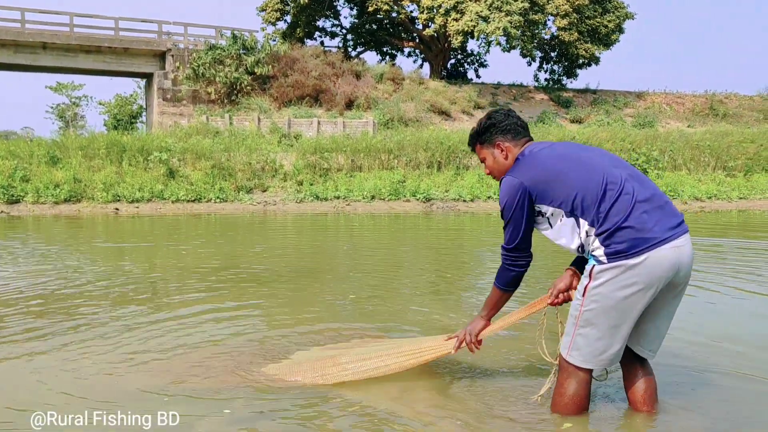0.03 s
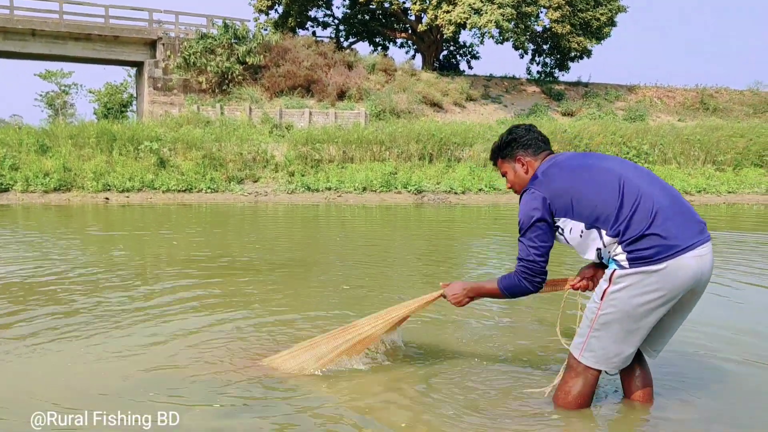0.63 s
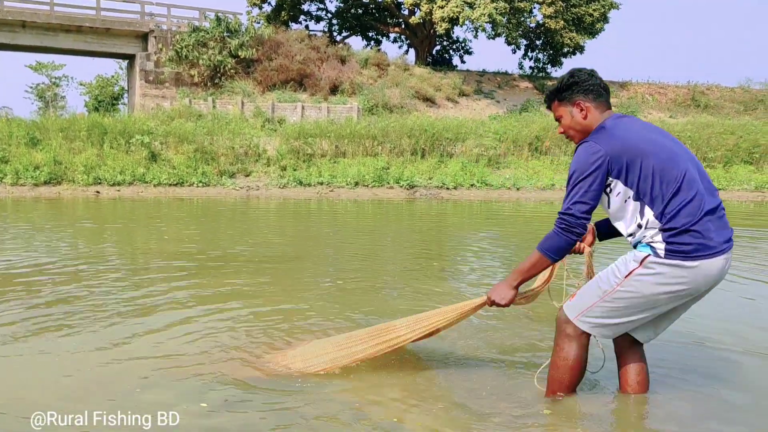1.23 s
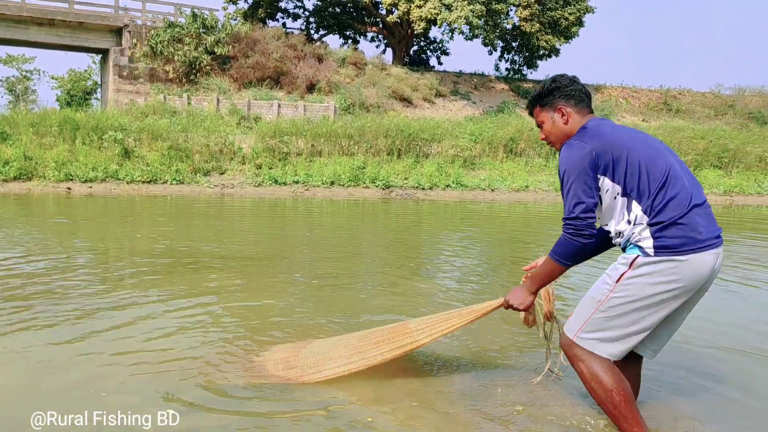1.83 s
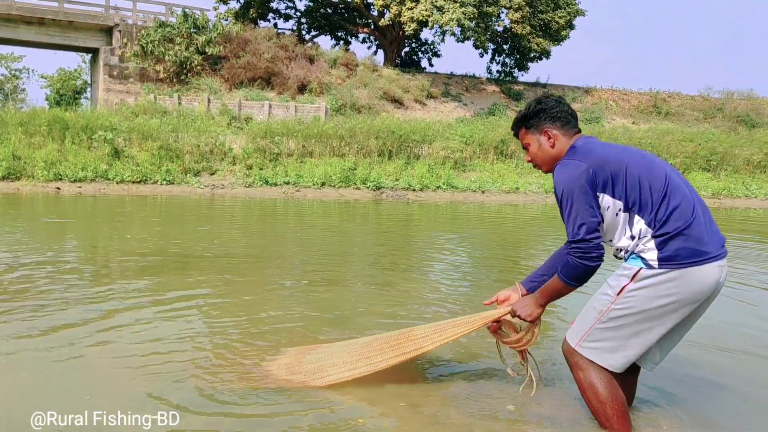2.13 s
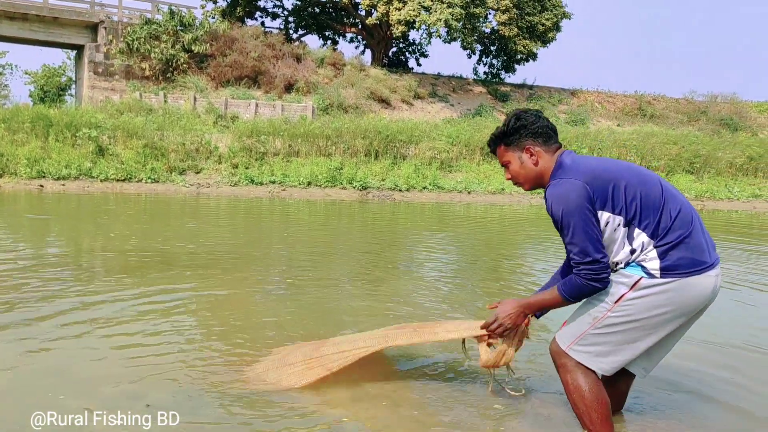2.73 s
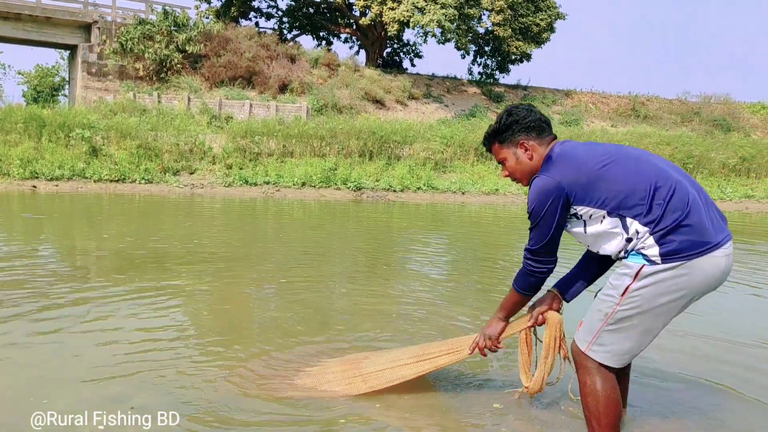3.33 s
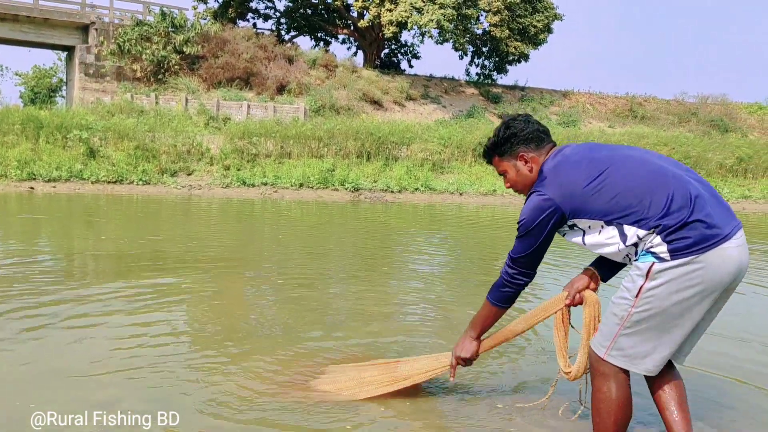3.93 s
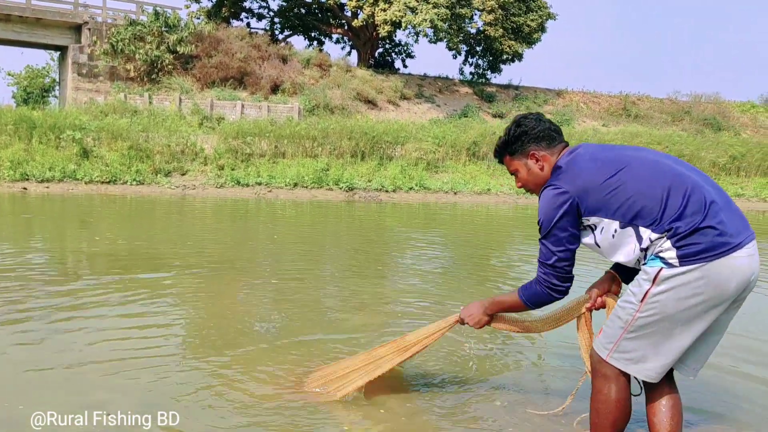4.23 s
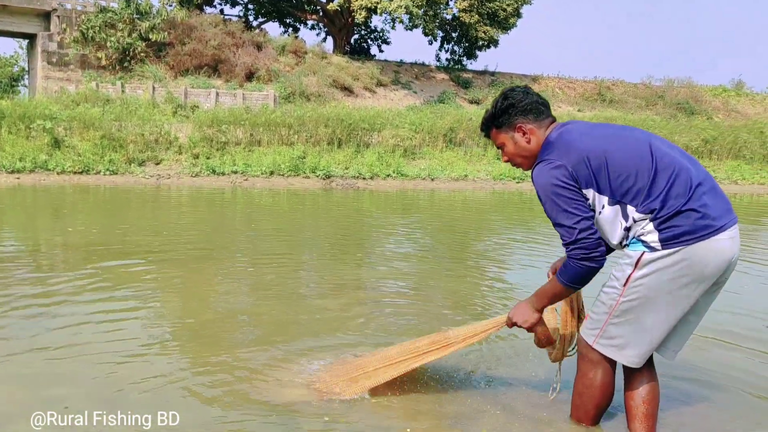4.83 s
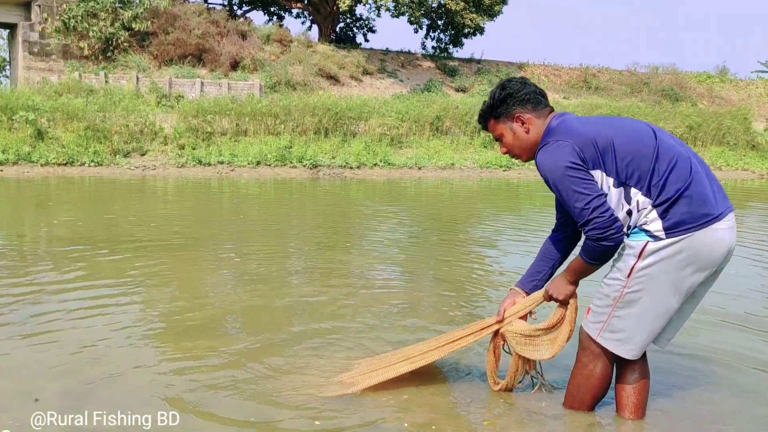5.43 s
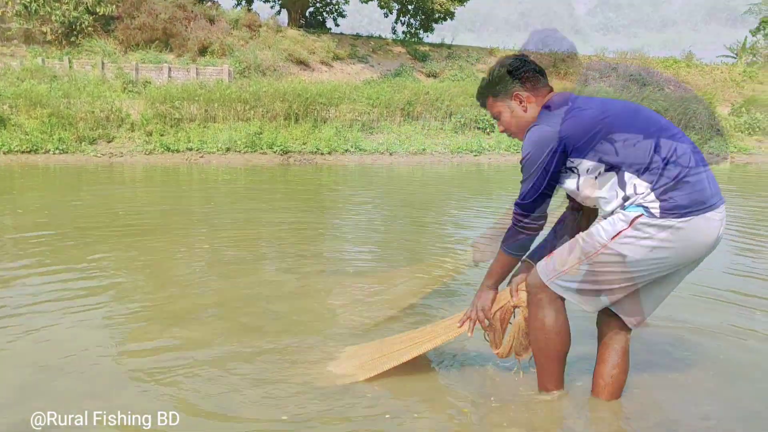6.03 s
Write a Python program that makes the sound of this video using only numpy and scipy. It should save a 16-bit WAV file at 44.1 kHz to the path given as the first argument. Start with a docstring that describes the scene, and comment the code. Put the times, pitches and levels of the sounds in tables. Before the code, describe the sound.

A wet fishing net is hauled through a shallow river close by. About a second in it slaps the surface and sheds spray, then water drips, trickles and gurgles. A foot splashes near the middle, and the net slaps and sprays again later. Small birds chirp and trill faintly from the bank, ending with one falling whistle. Wind rumbles and thumps on the microphone throughout.

```python
"""A wet cast net is hauled hand over hand out of a shallow river, while small birds call from the bank
and a breeze buffets the two ports of the microphone. About a second in, the mesh slaps the surface and
sheds a patter of spray; water drips, trickles and gurgles as trapped air rings. Near three seconds a
foot splashes and more bubbles follow. At four and a half the mesh slaps and sprays again, and one long
bird whistle slides down over the last drips."""
import sys
import numpy as np
from scipy import signal
from scipy.fft import rfft, irfft
from scipy.io import wavfile
from scipy.ndimage import uniform_filter1d

SR = 44100
rng = np.random.default_rng(int(sys.argv[2]) if len(sys.argv) > 2 else 0)


def materialize(psi):
    """Save the field psi as 16-bit PCM at rate SR to the path in sys.argv[1].

    A 1-D psi becomes a single channel; in a 2-D psi each row is a channel.
    """
    bounded = np.clip(np.atleast_2d(psi).T, -1, 1)
    quanta = np.round(bounded * 32767).astype(np.int16)
    wavfile.write(sys.argv[1], SR, quanta)


N = 269010
TIME = np.arange(N) / SR
HZ = np.fft.rfftfreq(N, 1 / SR)

# Net or foot hitting the water. Each row: crest time in seconds, relative level in dB, rise, hold and
# fall in seconds, brightness in dB per octave, body of the plunge in dB.
SLAPS = [(0.857, -41.5, 0.0041, 0.0066, .008, -1.5, 1), (0.8701, -23.5, 0.0021, 0.0036, .004, 6.5, 6),
         (1.0877, -30.5, 0.0044, 0.0013, 0.0039, 4, 11), (2.891, -38, 0.0003, 0.0053, 0.02, 2.5, 3),
         (2.8984, -37, .0003, 0.0043, 0.0058, -2.5, -1), (2.9142, -33.5, 0.00056, 0.0027, 0.0045, 2, 0),
         (4.553, -39.5, 0.0012, 0.0034, 0.0099, -1.5, 7.5), (4.57, -31.5, 0.0015, 0.0066, 0.0039, 1, 6),
         (4.578, -26, 0.0012, 0.0051, 0.0036, 5.5, -4), (4.798, -39, 0.0022, 0.005, 0.0079, -3, -19),
         (4.808, -37.5, 0.0082, 0.0085, 0.02, 1, -15)]
# Where a plunge adds body. Each row: frequency in Hz, share of the boost.
PLUNGE_BAND = [(550, 0.89), (1000, 0.11)]
# Showers off the lifted mesh. Each row: peak time in seconds, level in dB, rise and fall in seconds.
SHOWERS = [(.705, -55, 0.05, 0.079), (1.04, -49, 0.21, 0.16), (1.525, -59, .012, .018),
           (1.905, -55, .012, 0.019), (2.95, -56, 0.022, 0.09), (4.018, -53, .007, 0.014),
           (4.65, -50, 0.039, 0.26), (4.83, -59.5, .03, 0.32)]
# Swells of fine hiss: wet mesh sliding, or spray fizzing as it falls. Each row: middle in seconds,
# fizz level in dB, half length in seconds, swish level in dB.
HISS_SWELLS = [(.1, -55, 0.15, -59), (.69, -60, 0.04, -75), (1.95, -63, 0.33, -85), (3.05, -63, 0.24, -72),
               (3.635, -61, 0.46, -63.5), (4.607, -48.5, 0.071, -70), (5.75, -66.5, 0.73, -75)]
# Air pockets ringing as the net drains. Each row: start in seconds, pitch in Hz, level in dB, ring time
# (t60) in seconds, share by which the pitch rises in that time.
BUBBLES = [(.399, 2400, -54, 0.032, 0.058), (1.512, 1260, -54.5, 0.13, .05),
           (1.749, 2150, -48.5, 0.023, .05), (1.755, 865, -55, 0.083, .2), (1.772, 1090, -55, 0.065, 1.6),
           (1.844, 950, -55, 0.11, .03), (1.864, 676, -56.5, 0.14, .05), (1.87, 1300, -45.5, 0.068, .03),
           (1.893, 2610, -47, 0.016, 0.33), (1.903, 2290, -54, 0.027, .3), (1.92, 2500, -53, 0.023, .05),
           (1.93, 1130, -49, 0.047, 0.65), (1.967, 2220, -49, 0.018, .05), (2.089, 1740, -48.5, .035, .15),
           (2.13, 1094, -50, 0.074, .03), (2.172, 1220, -56, .07, .1), (2.517, 2670, -56, 0.05, 0.033),
           (2.897, 600, -33, 0.0069, .05), (2.898, 1320, -38, 0.021, .05), (2.898, 2080, -37, 0.022, .05),
           (2.912, 2330, -38.5, 0.012, .05), (2.915, 900, -33, 0.02, .05), (2.926, 2500, -40, 0.018, .1),
           (3.036, 2890, -51.5, 0.045, .08), (3.422, 2520, -49, 0.035, .03), (3.739, 1520, -47, 0.04, .1),
           (3.757, 1780, -49.5, 0.057, .03), (3.753, 2870, -49, 0.02, .03), (3.815, 723, -55, 0.1, .15),
           (3.839, 953, -48.5, 0.083, .01), (3.843, 2170, -52, .025, .1), (3.886, 904, -53, 0.12, .03),
           (3.887, 1270, -51.5, 0.055, .1), (3.957, 950, -51, .04, .3), (3.962, 2250, -49, .024, 0.18),
           (3.98, 2520, -46.5, 0.032, .05), (4.004, 2350, -48, 0.045, .03), (4.016, 2200, -51, 0.047, .03),
           (4.02, 700, -53, 0.06, .03), (4.045, 663, -48, 0.12, .08), (4.13, 672, -56, 0.18, 0.12),
           (4.16, 2260, -47.5, 0.025, .05), (4.155, 970, -54, .08, .03), (4.234, 1330, -54.5, 0.04, .05),
           (4.468, 1280, -54, 0.061, .3), (4.486, 2080, -50.5, 0.033, .15), (4.571, 580, -31.5, 0.013, .05),
           (4.579, 2580, -20, 0.0095, .05), (4.648, 2160, -45, 0.044, .05), (4.678, 2200, -45.5, .03, .05),
           (5.087, 3380, -49, 0.031, 0.051), (5.243, 2050, -57, 0.038, .05), (5.655, 2150, -52, 0.024, .03),
           (5.899, 2925, -49.5, 0.037, .3), (5.9658, 2270, -44, 0.016, .05)]
# Drops landing. Each row: start in seconds, relative level in dB, plink pitch in Hz, spatter trim in dB.
DRIPS = [(.663, -51.5, 8270, -12), (.711, -50, 6030, -12), (1.5352, -51, 7000, 0), (1.866, -56, 2530, -3),
         (1.877, -47, 7100, -3), (1.9616, -41.5, 10400, -8), (1.967, -52, 8400, 4),
         (1.979, -38.5, 6220, -11), (1.9847, -49, 12500, -8), (2.599, -54, 2980, 5),
         (2.982, -50, 10100, -10), (3.213, -53.5, 3330, 3), (3.216, -50, 5740, -6), (3.4219, -49, 6800, 2),
         (3.648, -54, 3760, -12), (3.7524, -38, 5500, -12.5), (3.831, -51, 4100, -10),
         (3.924, -45, 3310, -10), (4.013, -50, 3770, 1), (4.0205, -47.5, 3550, -1), (4.121, -51.5, 4650, 0),
         (4.137, -46.5, 5900, -5), (5.027, -52, 8100, -10), (5.282, -53, 7370, -14),
         (5.4209, -51.5, 11230, 0), (5.519, -61, 8950, -12), (5.576, -62, 8900, -10),
         (5.5917, -47.5, 9250, -16), (5.668, -51, 6100, -15), (5.678, -57, 2930, -15),
         (5.704, -50, 8350, -6), (5.709, -61, 7500, -7), (5.767, -55, 6330, -12),
         (5.8086, -46.5, 6440, -4.5), (5.892, -53, 2900, -2), (5.9183, -47, 2180, -5),
         (5.9235, -47, 3500, -10), (5.952, -51, 1520, -9), (5.954, -40, 5600, -10), (5.977, -49, 7530, 1.5)]
# Swirls around legs and net. Each row: middle in seconds, relative level in dB, half length in seconds.
SWIRLS = [(.22, -55, .05), (.72, -51, 0.069), (1, -52, 0.26), (1.55, -57.5, 0.18), (1.92, -55, 0.37),
          (2.78, -58.5, 0.18), (3.84, -54, 0.16), (4.17, -54.5, 0.79), (4.7, -55.5, 0.28)]
# Tone colours of the water. Each row: frequency in Hz, gain in dB.
SLAP_EQ = [(120, 1), (300, -6), (600, -1.5), (1300, 5), (2400, 6.5), (3500, 3), (5500, 8), (9500, 0.5),
           (12000, 0.5), (15500, -13.5)]
PATTER_EQ = [(200, -52), (500, -14), (1000, 1), (1700, 5), (2500, 4.5), (3500, -1.5), (5000, 2),
             (9000, -4.5)]
FIZZ_EQ = [(1500, -25), (3200, -10), (5000, -3), (6500, 0), (9000, -5.5), (11500, -4.5), (15500, -21)]
SWISH_EQ = [(3500, -35), (5100, -16), (5900, 2), (6500, -6), (7500, -13), (9500, -12), (13000, -32)]  # strands cutting the water
SPATTER_EQ = [(300, -7), (1000, 1), (2500, 9), (4000, 10), (6000, 15.5), (10000, 10), (15500, 6.5)]
SLOSH_EQ = [(200, -54), (450, -3), (750, -8), (1300, -0.5), (2400, -6.5), (3600, -10.5), (6000, -15),
            (12000, -11.5)]

# Buzzy or thin trills. Each row: start and length in seconds, relative level in dB, notes per second,
# pitch in Hz, fall within a note in Hz.
TRILLS = [(1.292, 0.135, -58, 129, 6580, 2000), (1.59, 0.14, -58, 131, 6600, 2000),
          (2.186, 0.08, -61, 64, 6700, 600), (2.42, .17, -65.5, 64, 6850, 600),
          (2.604, 0.2, -63.5, 65, 6840, 600), (3.056, 0.18, -60, 64, 6840, 600),
          (3.452, 0.33, -60.5, 63.3, 6900, 600), (4.057, 0.15, -60, 122, 6730, 2000)]
# Short chirps. Each row: start and length in seconds, relative level in dB, first, middle and last
# pitch in Hz.
CHIRPS = [(.07, 0.077, -69, 4150, 4080, 4070), (.29, 0.05, -68, 3920, 3680, 3600),
          (.465, 0.043, -62.5, 3350, 3444, 3330), (1.12, 0.027, -61, 2930, 3400, 4020),
          (1.48, 0.032, -57.5, 2560, 3360, 4180), (1.538, 0.016, -58.5, 2250, 2650, 3500),
          (2.351, 0.032, -65.5, 3020, 3780, 4350), (2.681, 0.045, -64, 2540, 3320, 4050),
          (2.81, 0.075, -67, 2580, 2690, 2780), (3.327, 0.045, -64, 2760, 2670, 2860),
          (3.445, 0.065, -68, 1550, 1890, 2080)]
# The arch of the long whistle. Each row: time in seconds, pitch in Hz, relative level in dB.
WHISTLE = [(5.595, 4470, -82), (5.63, 4800, -66), (5.665, 4950, -69), (5.735, 4970, -70),
           (5.775, 4970, -62), (5.855, 4610, -52.5), (5.89, 4520, -74), (5.96, 4640, -68),
           (6.003, 3950, -56), (6.045, 3620, -62), (6.09, 3280, -83)]

# Strength of the breeze at each port. Each row: time in seconds, level in dB.
BREEZE_LEFT = [(0, -44), (.52, -38), (.62, -28.5), (.76, -31.5), (.85, -28), (1.62, -29), (1.9, -43),
               (2.15, -39), (2.45, -30), (2.58, -42.5), (3, -27), (3.35, -35.5), (3.7, -32.5), (4.2, -30.5),
               (4.35, -35.5), (4.6, -32.5), (5.92, -42), (6.1, -33.5)]
BREEZE_RIGHT = [(0, -40), (.27, -37), (.45, -33), (1.1, -30), (1.62, -36.5), (1.76, -45.5), (2.06, -33.5),
                (2.16, -27), (2.3, -41.5), (2.9, -35), (3.15, -41), (3.35, -36), (3.95, -35.5),
                (4.3, -36.5), (5.1, -40.5), (6.1, -46)]
# Strong eddies striking a port. Each row: time in seconds, level in dB, nominal half width in seconds,
# left minus right in dB, wake relative to the thump in dB.
EDDIES = [(0.388, -27, 0.003, -41, -12), (0.625, -15, 0.0031, 34, -21.5), (0.884, -20, 0.0032, 27, -14),
          (.973, -27.5, 0.0027, 5, -4.5), (1.104, -11, 0.0029, 30, -19.5), (1.215, -20, 0.0048, 16, -26),
          (1.288, -12, 0.0043, 37, -13.5), (1.332, -14.5, 0.0041, 35, -20), (1.373, -15.5, 0.0056, 25, -35),
          (1.514, -13, 0.0049, 26, -21.5), (1.599, -13, 0.0037, 34, -25), (1.646, -22.5, 0.0018, 27, -7),
          (1.797, -21, 0.0048, 29, -26), (2.129, -19.5, 0.0032, 23, -29), (2.168, -19.5, 0.0038, 27, -16),
          (2.353, -24.5, 0.0081, 18, -24), (2.462, -16.5, 0.0051, 18, -23.5), (2.873, -17.5, 0.01, 28, -17),
          (2.939, -23, 0.0057, 22, -14.5), (3.008, -19, 0.0038, 26, -19), (3.045, -17.5, 0.0028, 27, -21),
          (3.086, -17, 0.0058, 27, -29), (3.119, -12.5, 0.0067, 28, -27), (3.177, -9.5, 0.0056, 37, -21.5),
          (3.215, -17.5, 0.0033, 30, -36), (3.293, -22.5, 0.0034, 18, -18), (3.371, -15, 0.008, 35, -16),
          (3.391, -26.5, 0.0025, 27, -18), (3.434, -23, 0.003, 33, -11), (3.579, -15, 0.0043, 27, -26),
          (3.927, -20.5, 0.0055, 15, -24), (4.191, -13, 0.0026, 39, -15.5),
          (4.236, -16.5, 0.0032, 34, -11.5), (4.758, -23, 0.004, 28, -21), (5.023, -22.5, 0.0049, 27, -27),
          (5.678, -21.5, 0.0058, 28, -29)]
# Tone colours of the wind, the riverside air and the ports. Each row: frequency in Hz, gain in dB.
RUMBLE_EQ = [(10, -3.5), (22, 9.5), (35, -1), (55, -2.5), (80, -11), (120, -20.5), (250, -60)]
FLUTTER_EQ = [(50, 0.5), (95, 4), (140, 3), (200, -6), (300, -19.5), (500, -31.5), (1000, -82)]
AIR_EQ = [(30, 6), (100, 9.5), (250, -3), (450, -5), (900, -7.5), (2000, -28), (4000, -8.5), (9000, -25),
          (15500, -17.5)]
LEFT_PORT_EQ = [(300, 0), (1100, -1.5), (1700, -3), (2300, 4.5), (2800, 4), (3600, -0.5), (5000, -7.5),
                (8000, -3.5), (15000, -6.5)]  # has a cavity resonance
RIGHT_PORT_EQ = [(300, 1), (1100, -3), (1600, -3.5), (2200, -5), (3000, -6), (3700, -7.5), (5000, -9.5),
                 (8000, -6), (15000, -6)]
# Stereo image of a wide source. Each row: frequency in Hz, left-right correlation.
CORRELATION = [(50, 0.23), (300, 0.86), (700, 0.34), (1400, 0.15), (3000, 0.1), (7000, 0.44),
               (15000, 0.068)]


def slaps():
    """A dense burst of impacts swells, holds while the mesh closes on the water, and dies in a wash."""
    out, t = np.zeros((2, N)), np.arange(-4096, 4096) / SR
    hz = np.fft.rfftfreq(len(t), 1 / SR)
    octaves = np.log2(np.maximum(hz, 400) / 3000)
    for s, db, rise, hold, fall, brightness, body_db in SLAPS:
        held = t - np.clip(t, 0, hold)
        hit = crest(held, rise, fall)
        wash = gain_of(-9) * crest(held, 4 * rise, fall=0.013)
        colour_db = curve_at(SLAP_EQ, hz) + body_db * curve_at(PLUNGE_BAND, hz)
        for envelope, db_per_octave in (hit, brightness), (wash, 2):
            impacts = droplets(per_s=2900, spread_db=3.5, mist=0.18, size=len(t), focus=0.2)
            burst = shaped(impacts, gain_of(colour_db + db_per_octave * octaves))
            add(out, s + t[0], gain_of(db + 0.5) * burst * envelope)
    return out


def spray():
    """Drops off the mesh patter down, trapping small bubbles; falling spray and sliding mesh hiss."""
    showers = [gain_of(db) * crest(TIME - s, rise, fall) for s, db, rise, fall in SHOWERS]
    shower = np.linalg.norm(showers, axis=0)
    patter = np.hypot(shower, gain_of(-66.5))  # the net never stops running with water
    hiss = swells([row[:3] for row in HISS_SWELLS], floor_db=-63.5)
    fizz = np.hypot(gain_of(-1.5) * shower, hiss)
    swish = swells([(s, db, half) for s, _, half, db in HISS_SWELLS], floor_db=-90)
    strands = unit_rms(coloured(droplets(per_s=2500, spread_db=2.5, mist=0.93), SWISH_EQ))
    drops = unit_rms(coloured(droplets(per_s=900, spread_db=2.5, mist=0.6), PATTER_EQ))
    trapped_air = froth(low_hz=1519, high_hz=3970, spread_db=7, t60=0.028, count=1400)
    fine = unit_rms(coloured(droplets(per_s=1400, spread_db=2.5, mist=0.98), FIZZ_EQ))
    coarse = unit_rms(drops + 0.19 * trapped_air) * waver(depth_db=0.15, size=700)
    return patter * coarse + fizz * fine * waver(depth_db=0.8, size=500) + swish * strands


def gurgles():
    """Each larger bubble closes with a wet smack, rings, and breaks off two weaker neighbours."""
    out, t = np.zeros((2, N)), np.arange(2048) / SR
    bins = np.fft.rfftfreq(len(t), 1 / SR)
    for (s, hz, db, t60, glide), neighbours in zip(BUBBLES, rng.random((len(BUBBLES), 2, 4))):
        add(out, s, gain_of(db) * bubble(hz, t60, glide, (neighbours[1, 3] - .5) * hz / 1500))
        ring_band = np.exp(-np.log2((bins + 1) / hz) ** 2 / 0.5)  # about an octave wide
        smack = shaped(droplets(per_s=1500, spread_db=5, mist=0.78, size=len(t)), ring_band)
        add(out, s, gain_of(db - 16) * smack * crest(t - .001, rise=0.00055, fall=0.0072))
        for late, pitch, softness, place in neighbours:
            small = bubble(hz * 2 ** (.9 * pitch - .4), 0.38 * t60, 0.14, (place - .5) * hz / 1000)
            add(out, s + 0.024 * late - .005, gain_of(db - 7.5 - 1.9 * softness) * small)
    return out


def drips(plink_t60=0.021):
    """A drop lands with a crisp spatter, and the hollow it punches plinks with a rising pitch."""
    out, t = np.zeros((2, N)), np.arange(2048) / SR
    colour = gain_of(curve_at(SPATTER_EQ, np.fft.rfftfreq(len(t), 1 / SR)))
    snap = crest(t - .0005, rise=0.00052, fall=0.0034)
    for (s, db, hz, spatter_db), (place, late, detune) in zip(DRIPS, rng.random((len(DRIPS), 3))):
        spatter = shaped(droplets(per_s=2700, spread_db=2, mist=0.87, size=len(t)), colour)
        plink = bubble(hz, plink_t60, 0.084, 3 * (place - .5))
        second_plink = bubble(hz * (.85 + 0.313 * detune), plink_t60, .12, 3 * (.5 - place))
        add(out, s, gain_of(db + spatter_db + 3.5) * spatter * snap)
        add(out, s, gain_of(db + 0.5) * plink)
        add(out, s + .004 * late, gain_of(db - 3) * second_plink)
    return out


def trickle():
    """Slosh with stray bubbles and tiny drops; bubble clusters join in where the water swirls hard."""
    stir = swells(SWIRLS, floor_db=-61.5)
    bubbling = froth(low_hz=600, high_hz=3600, spread_db=16, t60=.024, count=1400)
    clusters = unit_rms(bubbling * waver(depth_db=4, size=900)) * np.sqrt(stir / stir.max())
    slosh = unit_rms(coloured(droplets(per_s=500, spread_db=2.5, mist=0.66), SLOSH_EQ))
    strays = gain_of(-76.5) * froth(low_hz=1492, high_hz=4250, spread_db=2, t60=0.065, count=140)
    ticks = gain_of(-71.5) * froth(low_hz=4480, high_hz=13500, spread_db=11, t60=0.018, count=500)
    return stir * (gain_of(-14.5) * clusters + gain_of(-8.5) * slosh) + strays + ticks


def droplets(per_s, spread_db, mist, size=N, focus=0):
    """Random impacts of very unequal strength over a mist of tiny ones, at both ports."""
    strength = gain_of(spread_db * np.minimum(rng.exponential(1, (2, size)), 4))
    hits = strength * rng.choice([-1, 1], (2, size)) * (rng.random((2, size)) < per_s / SR)
    return stereo_image(unit_rms(hits) + mist * rng.standard_normal((2, size)), focus)


def bubble(hz, t60, glide, port_phase):
    """A pocket of air rings and rises in pitch as it nears the surface."""
    t = np.arange(int(t60 * SR) + 8) / SR
    phase = 2 * np.pi * hz * (t + glide * t ** 2 / (2 * t60))
    envelope = np.exp(-np.log(1000) * t / t60) * (1 - np.exp(-t / 0.00012))
    return np.sin([phase + port_phase, phase]) * envelope


def froth(low_hz, high_hz, spread_db, t60, count):
    """A steady crowd of bubbles of random size, strength and place; large ones ring longer."""
    out = np.zeros((2, N))
    for when, pitch, strength, length, glide, place in rng.random((count, 6)):
        hz = low_hz * (high_hz / low_hz) ** pitch
        ring_s = t60 * (.5 + length) * (2000 / hz) ** 0.25
        ring = bubble(hz, ring_s, 0.3 * glide, (place - .5) * hz / 700)
        add(out, when * N / SR, gain_of(spread_db * strength ** 2) * ring)
    return unit_rms(out)


def birds():
    """Trills of quick falling notes, short chirps and one arching whistle from the far bank."""
    out = np.zeros((1, N))
    for s, length, db, rate, hz, fall in TRILLS:
        t = np.arange(int(length * SR)) / SR
        note = (t * rate) % 1
        envelope = abs(np.sin(np.pi * note)) ** 2.6 * signal.windows.tukey(len(t), .3)
        add(out, s, gain_of(db) * envelope * bird_tone(hz + fall * (.5 - note), jitter=500, size=60))
    for s, length, db, *pitches in CHIRPS:
        progress = np.linspace(0, 1, int(length * SR))
        pitch = np.polyval(np.polyfit([0, .5, 1], pitches, 2), progress)
        envelope = signal.windows.tukey(len(pitch), .7)
        add(out, s, gain_of(db) * envelope * bird_tone(pitch, jitter=350, size=100))
    s, hz, db = np.transpose(WHISTLE)
    t = np.arange(s[0], s[-1], 1 / SR)
    add(out, s[0], gain_of(np.interp(t, s, db)) * bird_tone(np.interp(t, s, hz), jitter=250, size=100))
    calls = out * waver(depth_db=4, size=600)  # moving air makes far calls waver
    return gain_of(-0.5) * (calls + gain_of(-6) * bank_echo(calls))


def bird_tone(hz, jitter, size):
    """A sine follows a pitch line, roughened by noise smoothed over size samples."""
    pitch = hz + jitter * uniform_filter1d(rng.standard_normal(len(hz)), size)
    return np.sin(2 * np.pi * np.cumsum(pitch) / SR)


def wind(ripples_per_s=14):
    """The breeze rumbles in each port and flutters raggedly as it stiffens, with eddies on top."""
    breeze = gain_of([np.interp(TIME, *np.transpose(port)) for port in (BREEZE_LEFT, BREEZE_RIGHT)])
    flutter = gain_of(-52.5) * (breeze / gain_of(-31)) ** 1.62  # grows faster than the rumble
    buffets = np.array([unit_rms(waver(depth_db=1, size=3500)) for port in breeze])
    rumble = breeze * buffets * turbulence(RUMBLE_EQ, steadiness=0.62)
    small_eddies = rng.uniform(-1.3, 1, (2, N)) * (rng.random((2, N)) < ripples_per_s / SR)
    ripples = gain_of(-11) * flutter * unit_rms(coloured(small_eddies, FLUTTER_EQ))
    thumps, wakes = eddies()
    ragged = turbulence(FLUTTER_EQ, steadiness=0.78) * waver(depth_db=3, size=600)
    return rumble + ripples + thumps + (flutter + wakes) * ragged


def eddies():
    """The lopsided low-pressure core of a vortex thumps a port; gives thumps and wake envelopes."""
    thumps, wakes = np.zeros((2, 2, N))
    t = np.arange(-4096, 4096) / SR
    spread = np.exp(-(t / 0.036) ** 2)
    for (s, db, width, pan_db, wake_db), skew in zip(EDDIES, rng.uniform(-1.1, 1, len(EDDIES))):
        passage = t / (1.1 * width)
        suction = -(1 + skew * passage) * (1 + passage ** 2) ** -3
        thump = suction - suction.sum() * spread / spread.sum()  # no net pressure
        ports = np.array([[gain_of(pan_db)], [1]])
        strength = gain_of(db) * ports / np.linalg.norm(ports)
        add(thumps, s + t[0], strength * thump)
        add(wakes, s + t[0], strength * gain_of(wake_db) * crest(t, rise=0.011, fall=0.013))
    return thumps, wakes


def turbulence(eq, steadiness):
    """Low noise, unrelated at the two ports, with its slow swings partly evened out."""
    noise = coloured(rng.standard_normal((2, N)), eq)
    power = abs(uniform_filter1d(noise ** 2, 4000, axis=1)) + 1e-20
    return unit_rms(noise / power ** (steadiness / 2))


def open_air():
    """A faint, steady bed of riverside air."""
    return gain_of(-62) * unit_rms(coloured(stereo_image(rng.standard_normal((2, N))), AIR_EQ))


def bank_echo(x):
    """A brief diffuse echo from the water and the bank."""
    t = np.arange(SR // 4) / SR
    tail = rng.standard_normal((2, len(t))) * np.exp(-t / 0.017) * (t > .004)
    return signal.fftconvolve(x, tail / np.linalg.norm(tail[0]), axes=1)[:, :N]


def stereo_image(x, focus=0, lag_s=0.000222, lag_from_hz=2980):
    """Makes two noises partly alike, treble later on the left; focus narrows them toward one spot."""
    hz = np.fft.rfftfreq(x.shape[-1], 1 / SR)
    common, separate = rfft(x)
    likeness = np.clip(1 - (1 - focus) * (1 - curve_at(CORRELATION, hz)), 0, 1)
    treble = hz ** 6 / (hz ** 6 + lag_from_hz ** 6)
    left = common * np.exp(-2j * np.pi * hz * lag_s * treble)
    right = likeness * common + np.sqrt(1 - likeness ** 2) * separate
    return irfft(np.array([left, right]), x.shape[-1])


def waver(depth_db, size):
    """A gain that wanders at random over about size samples."""
    drift = uniform_filter1d(uniform_filter1d(rng.standard_normal(N), size), size // 2)
    return gain_of(depth_db * unit_rms(drift))


def swells(rows, floor_db):
    """A gain that swells and sinks once per row, above a steady floor."""
    power = sum(gain_of(db) ** 2 * np.exp(-2 * ((TIME - s) / half) ** 2) for s, db, half in rows)
    return np.sqrt(power + gain_of(floor_db) ** 2)


def crest(t, rise, fall):
    """An envelope that grows to 1 at t = 0 and dies away."""
    return np.exp(-abs(t) / np.where(t < 0, rise, fall))


def coloured(x, eq):
    """Runs a full-length track through an EQ curve."""
    return irfft(rfft(x) * gain_of(curve_at(eq, HZ)), N)


def shaped(burst, gains):
    """Filters a short burst with one gain per frequency bin, then scales it to rms 1."""
    return unit_rms(irfft(rfft(burst) * gains))


def curve_at(points, hz):
    """Reads a curve on a log-frequency axis."""
    point_hz, values = np.transpose(points)
    return np.interp(np.log(hz + 1), np.log(point_hz), values)


def gain_of(db):
    """Decibels to a factor."""
    return 10 ** (np.asarray(db) / 20)


def unit_rms(x):
    """Scales to rms 1."""
    return x / np.sqrt(np.mean(x ** 2) + 1e-20)


def add(mix, s, sound):
    """Mixes a sound in at s seconds."""
    part = mix[..., max(round(s * SR), 0):][..., :sound.shape[-1]]
    part += sound[..., :part.shape[-1]]


def scene():
    """Water up front, with a touch of echo on gurgles and drips; birds, air and wind around it."""
    air = open_air()
    plinks = gurgles() + drips()
    water = slaps() + spray() + trickle() + plinks + gain_of(-13) * bank_echo(plinks)
    return water + birds() + air + wind()


def record(dry):
    """Each microphone port colours its side, then a steep low-pass trims the top."""
    heard = np.array([coloured(dry[0], LEFT_PORT_EQ), coloured(dry[1], RIGHT_PORT_EQ)])
    low_pass = signal.firwin(511, cutoff=15700, window=("kaiser", 9), fs=SR)
    return signal.oaconvolve(heard, low_pass[None], "same")


dry = scene()
out = record(dry)
materialize(out)
```